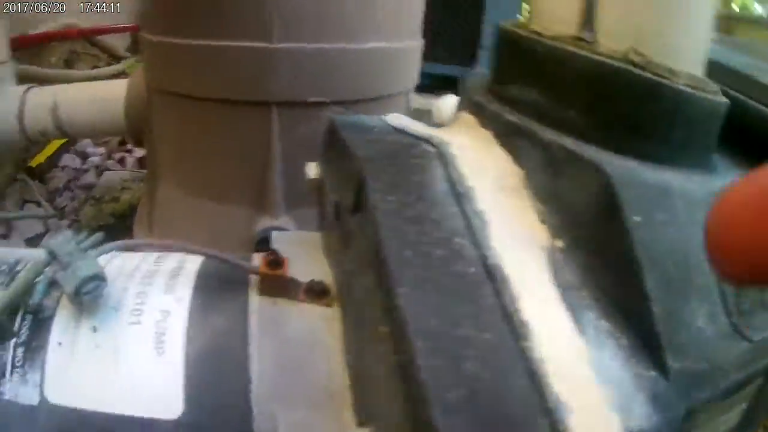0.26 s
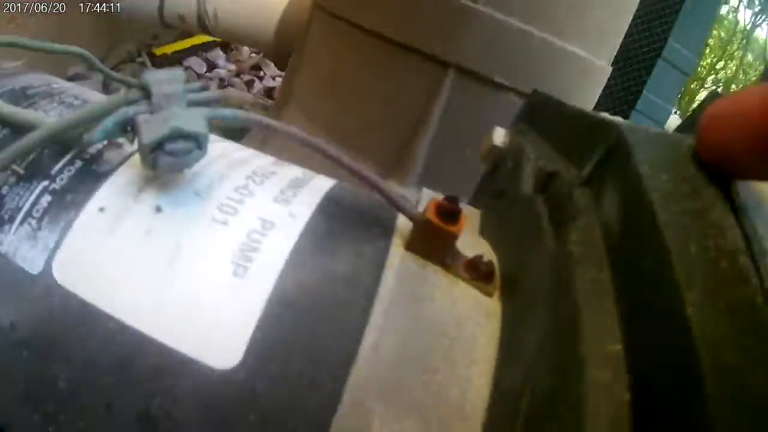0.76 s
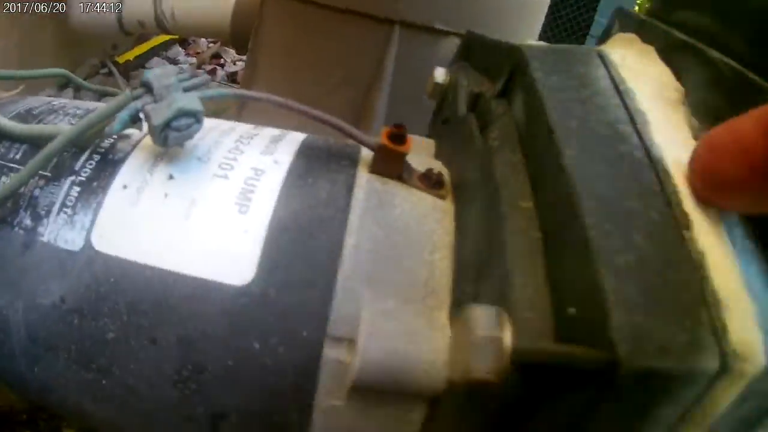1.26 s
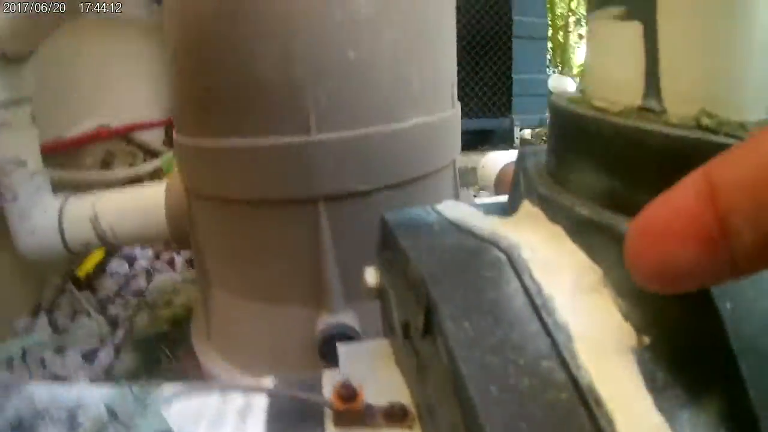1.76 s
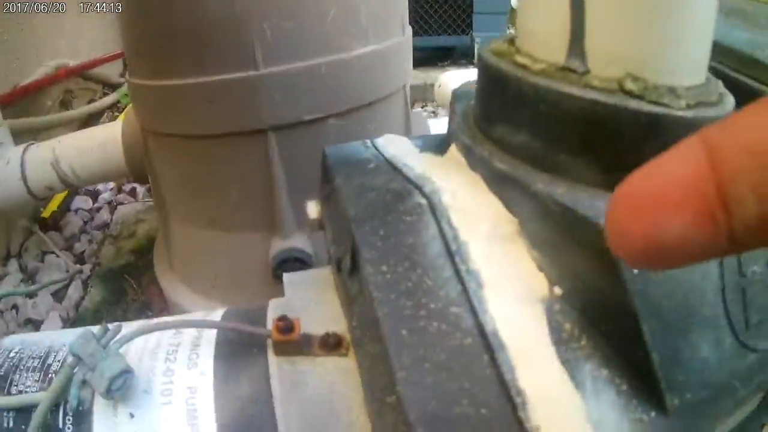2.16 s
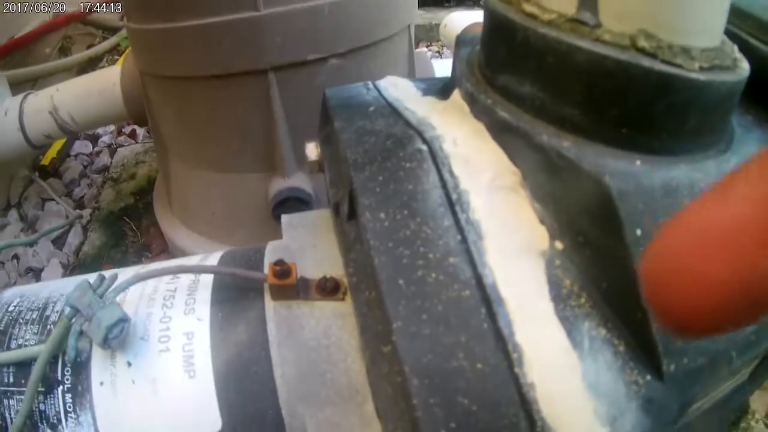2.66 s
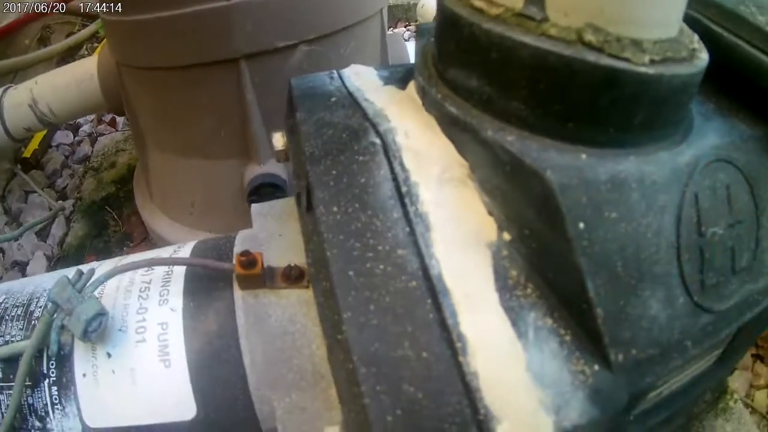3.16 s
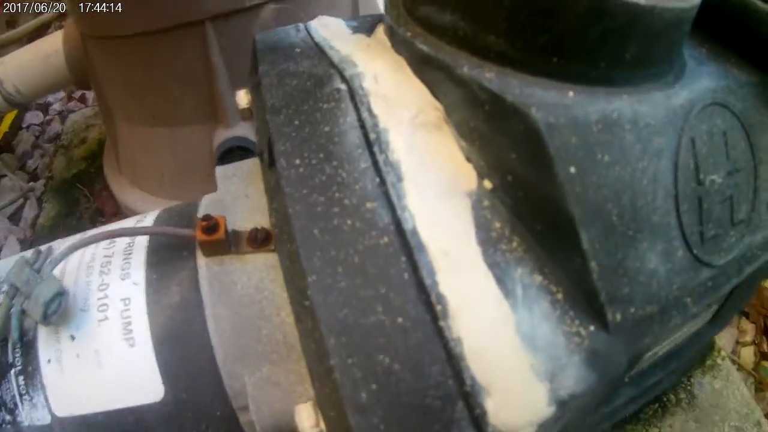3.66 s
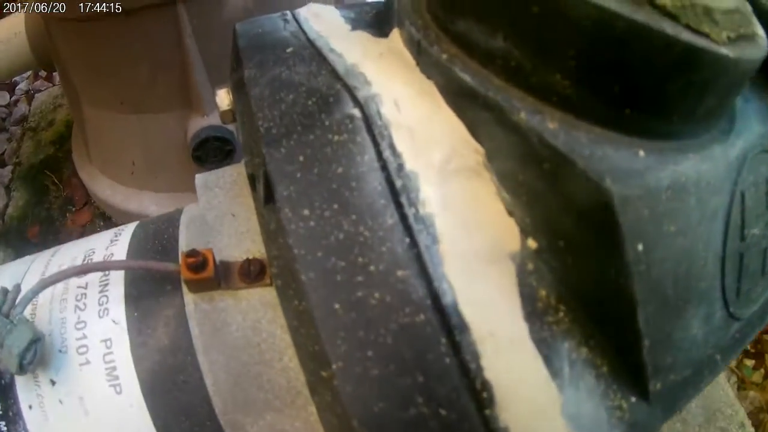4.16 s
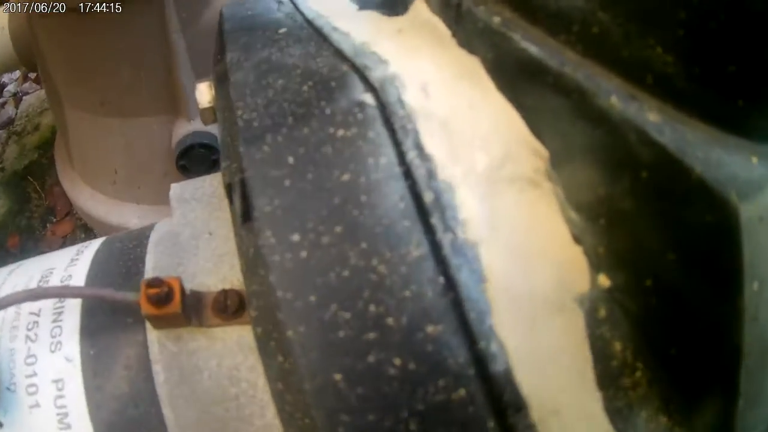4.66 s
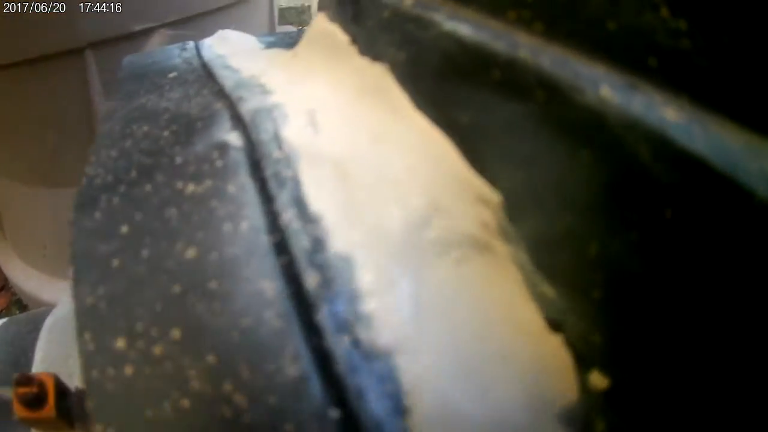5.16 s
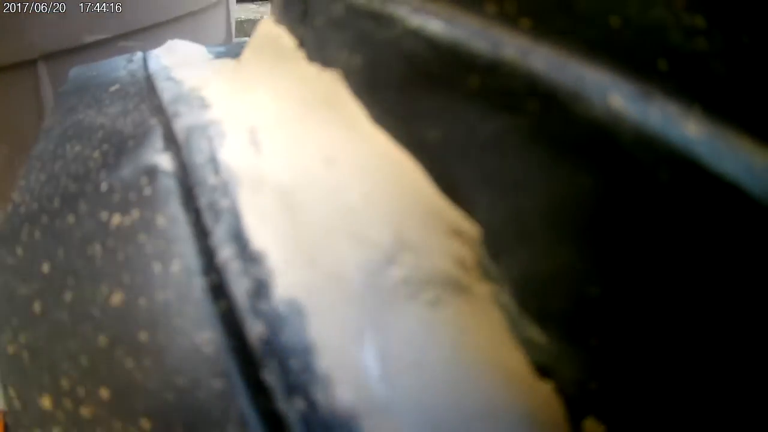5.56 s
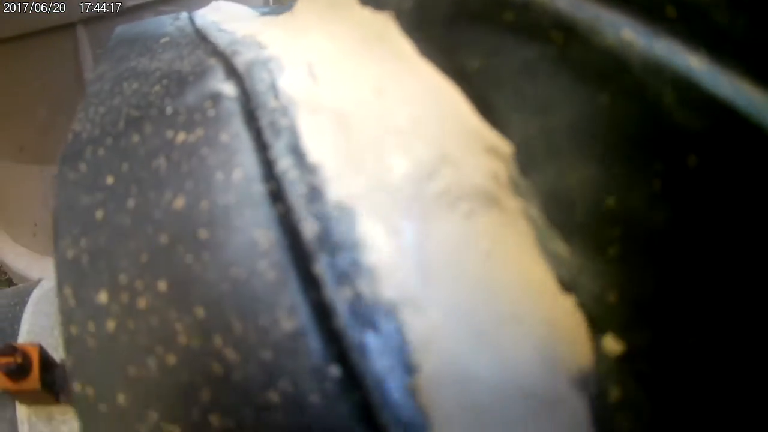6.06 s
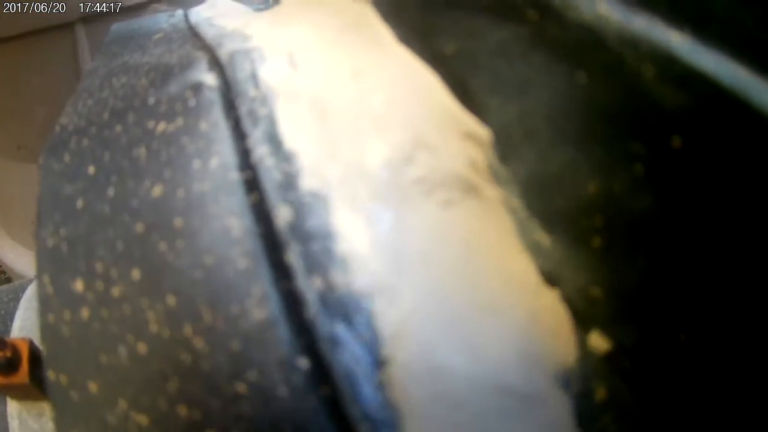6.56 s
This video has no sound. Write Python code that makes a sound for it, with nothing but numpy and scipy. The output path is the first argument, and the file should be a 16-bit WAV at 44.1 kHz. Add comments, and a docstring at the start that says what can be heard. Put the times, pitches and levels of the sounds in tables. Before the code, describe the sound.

Close, steady drone of an electric pool pump with churning water, while fingers knock and scuff on the microphone.

```python
"""A pool pump running outdoors, close up on a hand-held phone microphone that creeps toward its housing.
The induction motor hums and whines, the impeller sings, water churns in the casing and the fan hisses.
Right at the microphone, fingers knock, scuff and slip on the phone's case and the unsteady hand rumbles.
Twice the hand rests on the pump, and the hum comes up through the grip."""
import sys
import numpy as np
from scipy import signal
from scipy.fft import rfft, irfft, dct
from scipy.io import wavfile
from scipy.ndimage import uniform_filter1d

SR = 44100
rng = np.random.default_rng(int(sys.argv[2]) if len(sys.argv) > 2 else 0)


def generate_wav(sig):
    """Save sig (samples, or channels by samples) to the path in sys.argv[1] as 16-bit PCM at SR."""
    pcm = np.round(np.clip(np.atleast_2d(sig).T, -1, 1) * 32767).astype(np.int16)
    wavfile.write(sys.argv[1], SR, pcm)


N = 299880

SHAFT_HZ, MAINS_HZ, RATTLE_HZ = 57.98, 60, 119.05
CHATTER_MULTIPLE, CHATTER_DB, CHATTER_FLUTTER_DB, CHATTER_SLIP_TURNS = 20, -62.5, 2.5, 0.06
# Magnetic hum and rotor-slot sidebands, beside the motor: shaft_multiple, mains_multiple, level_db
MAGNETIC_TONES = [(0, 2, -54), (0, 22, -73), (0, 28, -74), (0, 32, -78), (0, 38, -76), (36, 0, -78),
                  (36, 2, -72), (36, 4, -75), (72, -2, -70), (72, 0, -70), (72, 2, -72), (72, 4, -79),
                  (71, 2, -75), (84, 6, -85), (108, 2, -87)]
# Thin whine from the bearing: rattle_multiple, level_db
BEARING_TONES = [(30, -73), (31, -75), (32, -75), (33, -69), (34, -72), (35, -77), (36, -78)]
def motor(shaft, mains):
    """Magnetic pull on stator and rotor slots, a whining bearing and a loose cover that chatters."""
    magnetic = sum(tone(round(per_shaft) * shaft + round(per_mains) * mains, db, waver_db=2.0)
                   for per_shaft, per_mains, db in MAGNETIC_TONES)
    rattle = shaft * RATTLE_HZ / SHAFT_HZ
    bearing = sum(tone(round(multiple) * rattle, db, waver_db=3.5) for multiple, db in BEARING_TONES)
    cover = CHATTER_MULTIPLE * mains + CHATTER_SLIP_TURNS * walk(45)
    chatter = tone(cover, CHATTER_DB + CHATTER_FLUTTER_DB * walk(28), waver_db=3.0)
    return magnetic + bearing + chatter


# Impeller tones, close to the casing: shaft_multiple, level_db, db_per_near_db, db_per_motor_db
IMPELLER_TONES = [(1, -55.5, -10, 7), (6, -58, 1.6, 1.56), (10, -62, 2, -1), (12, -55.5, 4.5, -1.3),
                  (18, -70.5, 4.5, 1), (20, -80, 6, -8), (30, -70, -9, 4)]
def impeller(shaft, near_db, motor_db):
    """Vanes pass the outlet; each tone beams its own way, so it swells or fades as the phone moves."""
    return sum(tone(round(multiple) * shaft, db + by_near * near_db + by_motor * motor_db, waver_db=1.0)
               for multiple, db, by_near, by_motor in IMPELLER_TONES)


# Water heard through the casing wall: frequency_hz, gain_db
WATER_SPECTRUM = [(120, -5), (230, -3.5), (330, -9.5), (400, -7), (480, 2), (680, -3.5), (830, -5),
                  (1020, -7), (1190, 0), (1300, -5.5), (1390, -9), (1475, -3.5), (1600, -8), (1810, -9.5),
                  (2250, -13), (2550, -17.5), (3200, -21.5), (5000, -68)]
def water(shaft):
    """Turbulence in the casing, throbbing twice a turn."""
    throb = 1 + 0.043 * np.sin(4 * np.pi * shaft)
    churn = grains(spread_db=3) * throb * undb(0.24 * walk(6.7))
    return level(colour(churn, WATER_SPECTRUM), db=-47)


# Air at the motor's vents: frequency_hz, gain_db
FAN_SPECTRUM = [(1800, -37), (2750, -18), (3000, -9), (3280, 3), (3750, -4), (4000, 0.7), (4450, -8),
                (4900, -6.5), (5500, -14), (6400, -12), (7800, -16.5), (10400, -19), (12500, -19),
                (15500, -14)]
def fan(mains):
    """Cooling air hisses through the vents, fluttering with the motor's pull."""
    flutter = 1 + 0.036 * np.sin(4 * np.pi * mains)
    air = grains(spread_db=3) * flutter * undb(0.32 * walk(12))
    return level(colour(air, FAN_SPECTRUM), db=-55)


# The microphone leans over the motor, draws back, then creeps up to the casing:
# start_s, length_s, near_change_db, motor_change_db
MIC_MOVES = [(0.4, 0.48, 1.33, 3.0), (1.38, 0.59, -1.29, -3), (3.507, 2.2, 2, 1.23)]
def mic_position():
    """Closeness to the impeller and exposure to the motor in dB; every move eases in and out."""
    t = np.arange(N) / SR
    near_db, motor_db = -1.0, -0.5
    for start, length, near_change, motor_change in MIC_MOVES:
        progress = np.sin(np.pi / 2 * np.clip((t - start) / length, 0, 1)) ** 2
        near_db = near_db + near_change * progress
        motor_db = motor_db + motor_change * progress
    return near_db, motor_db


# Fingers knocking right by the microphone: start_s, strength_db, contact_ms
FINGER_KNOCKS = [(.1690, 27, 0.051), (0.172, 9, 0.082), (0.2447, 14.5, 0.061), (0.246, 10.5, 0.14),
                 (0.251, 35, 3.2), (0.4389, 5.5, 0.25), (0.797, 28, 4.1), (1.3265, 11, 0.81),
                 (1.8948, 15, 0.63), (3.351, 22, 2.7), (3.3612, 23.5, 1.37), (3.3621, -0.5, 0.027),
                 (5.04, 1, 0.48)]
# Resonances of the phone's case: pitch_hz, width_hz, gain_db
CASE_MODES = [(72.5, 48, 10.5), (155, 144, 1.5), (715, 1250, 1), (1138, 93, 0.5), (1455, 49, 2.5),
              (1810, 51, -5.5), (3130, 180, -10), (3644, 420, 0), (5760, 870, -8), (10400, 730, -26)]
# The phone wobbling in the grip: pitch_hz, width_hz, gain_db
GRIP_MODES = [(32.5, 4.3, 3)]
def fingers():
    """Knocks, judders and scuffs all ring the phone's case; knocks also rock it in the grip."""
    knocks = sum(push(*row) for row in FINGER_KNOCKS)
    force = knocks + sum(judder(*row) for row in FINGER_JUDDERS)
    soft_fingertip = signal.butter(4, 6600, fs=SR, output="sos")
    taps = ring(signal.sosfilt(soft_fingertip, force), CASE_MODES)
    return taps + ring(knocks, GRIP_MODES) + sum(scuff(*row) for row in FINGER_SCUFFS)


def push(start, db, contact_ms):
    """The force of one contact; a softer one lasts longer."""
    age = np.maximum(np.arange(N) / SR - start, 0) * 1000 / contact_ms
    force = age * np.exp(-np.minimum(age, 60))
    return undb(db) * force / force.sum()


FINGER_PAD_HZ = [140, 316]  # the band in which the pad shudders
# A fingertip juddering over the phone: start_s, length_s, slip_rate_hz, strength_db
FINGER_JUDDERS = [(1.342, 0.027, 117, 11.5), (1.387, .013, 192, 13), (1.44, 0.006, 230, 6.5)]
def judder(start, length, rate, db):
    """A fingertip sticks and slips at a near-steady rate: a short, low, pitched rub."""
    slips = sum(push(s + 0.028 * rng.standard_normal() / rate, db + rng.standard_normal(), 0.66)
                for s in np.arange(start, start + length, 1 / rate))
    return signal.sosfilt(signal.butter(2, FINGER_PAD_HZ, "bandpass", fs=SR, output="sos"), slips)


# Fingers brushing the phone: middle_s, half_length_s, level_db, low_hz, high_hz
FINGER_SCUFFS = [(0.173, 0.02, -34, 200, 18000), (0.242, 0.02, -32, 201, 18000),
                 (0.269, 0.013, -35.5, 2080, 3400), (0.942, 0.014, -62, 8000, 18000),
                 (1.587, 0.023, -37, 101, 10900), (1.738, 0.037, -43.5, 100, 9000),
                 (1.848, 0.076, -44.5, 99, 9100), (3.363, 0.0027, -28, 980, 11000),
                 (3.37, 0.022, -34.5, 200, 14000), (3.398, 0.017, -41.5, 200, 8000)]
# Skin on plastic, right at the microphone: frequency_hz, gain_db
GRIT_SPECTRUM = [(100, 12), (1000, 5), (2100, 4), (2800, 0), (3700, 5), (4600, -1.5), (5900, -1),
                 (7800, -8.5), (10600, -1), (15000, -5)]
def scuff(middle, half_length, db, low_hz, high_hz):
    """Skin grits over the case, pressing evenly and stopping quickly; each stroke has its own band."""
    grit = ring(colour(grains(spread_db=0.5), GRIT_SPECTRUM), CASE_MODES)
    band = signal.butter(2, [low_hz, high_hz], "bandpass", fs=SR, output="sos")
    pressure = np.exp(-((np.arange(N) / SR - middle) / half_length) ** 4)
    return level(signal.sosfilt(band, grit), db) * pressure


RUMBLE_SWAY_DB, SHAFT_SHAKE_DB = 1.5, -3.5
# Handling rumble at the microphone: time_s, level_db
RUMBLE_LEVELS = [(0.0, -32.5), (0.09, -34.5), (0.26, -24.5), (0.42, -27.5), (1.93, -32.5), (2.14, -38.5),
                 (2.67, -34), (6.8, -36.5)]
# Tone of that rumble: frequency_hz, gain_db
RUMBLE_SPECTRUM = [(7.1, -52), (12, 3), (31, 0), (54, -7), (124, -18.5), (147, -23), (244, -42), (290, -32),
                   (380, -83), (640, -120)]
def hand(shaft, mains):
    """The grip rumbles, and passes on the pump's hum and the shake of its unbalanced shaft."""
    rumble_db, = curves(RUMBLE_LEVELS)
    rumble = level(colour(rng.standard_normal(N), RUMBLE_SPECTRUM), 0)
    rumble *= undb(rumble_db + RUMBLE_SWAY_DB * walk(8.4))
    shaking = tone(2 * mains, 0, waver_db=0.8) + tone(shaft, SHAFT_SHAKE_DB, waver_db=0.8)
    return rumble + shaking * sum(touch(*row) for row in PUMP_TOUCHES)


TOUCH_ATTACK_S, TOUCH_RELEASE_S, PRESS_DB_PER_S = 0.033, 0.07, 12
# The microphone hand resting on the pump: start_s, length_s, starting_gain_db
PUMP_TOUCHES = [(1.07, 0.263, -44), (5.36, 0.531, -39.5)]
def touch(start, length, db):
    """Gain of the path through the hand: it takes hold, presses harder and lets go."""
    age = np.arange(N) / SR - start
    held = np.clip(age / TOUCH_ATTACK_S, 0, 1) * np.clip(1 - (age - length) / TOUCH_RELEASE_S, 0, 1)
    return held * undb(db + PRESS_DB_PER_S * np.clip(age, 0, length))


def undb(db):
    """Decibels to gain."""
    return 10 ** (np.asarray(db) / 20)


def level(x, db):
    """Scale a sound to an rms level."""
    return x * undb(db) / np.sqrt(np.mean(x ** 2))


def curves(table):
    """The columns of a timed table, one value a sample."""
    times, *columns = np.transpose(table)
    return [np.interp(np.arange(N) / SR, times, column) for column in columns]


def walk(rate):
    """Random values held 1 / rate s and smoothed twice, at an rms of 1."""
    hold = int(SR / rate)
    steps = np.repeat(rng.standard_normal(N // hold + 1), hold)
    return level(uniform_filter1d(uniform_filter1d(steps, hold), hold)[:N], 0)


def colour(x, spectrum):
    """Filter by a curve of frequency_hz, gain_db."""
    hz, db = np.transpose(spectrum)
    f = np.maximum(np.arange(N), 1) * SR / (2 * N)
    gain = undb(np.interp(np.log(f), np.log(hz), db))
    return dct(dct(x, norm="ortho") * gain, type=3, norm="ortho")


def ring(x, modes):
    """Drive resonances of pitch_hz, width_hz, gain_db."""
    f = np.maximum(np.arange(N // 2 + 1), .5) * SR / N
    response = sum(undb(db) / (1 + 1j * (f * f - hz * hz) / (f * width)) for hz, width, db in modes)
    return irfft(rfft(x) * response, N)


def grains(spread_db):
    """Dense tiny impacts of uneven size."""
    return level(rng.standard_normal(N) * undb(spread_db * rng.standard_normal(N)), 0)


def tone(turns, db, waver_db):
    """A sine that follows a count of turns and wavers in level."""
    return np.sqrt(2) * undb(db + waver_db * walk(9.1)) * np.sin(2 * np.pi * (turns + rng.random()))


def scene():
    """The pump from where the phone is held, with the handling noise on top."""
    near_db, motor_db = mic_position()
    mains = MAINS_HZ * np.arange(N) / SR  # mains and shaft are phases, counted in turns
    shaft = np.cumsum(SHAFT_HZ * (1 + 0.000304 * walk(4.08))) / SR  # the water load nudges the speed
    wet_end = impeller(shaft, near_db, motor_db) + water(shaft) * undb(near_db)
    dry_end = (motor(shaft, mains) + fan(mains)) * undb(motor_db)
    return (wet_end + dry_end + hand(shaft, mains) + fingers())[None]


OVERLOAD, TOP_HZ = .92, 15750
# Narrow bands that cancel on the way into the microphone: centre_hz, width_hz, cancelled_share_db
MIC_NOTCHES = [(1347, 124, -2.5), (1729, 38, -6.5), (2680, 470, -13.5)]
# Treble response of the microphone port: frequency_hz, gain_db
MIC_PORT = [(6300, 0.5), (7800, -8.5), (10000, -1.5), (15000, -10.5)]
def record(dry):
    """The microphone hollows a few bands, rounds the hardest knock, dulls the treble and cuts the top."""
    hollow = dry - ring(dry, MIC_NOTCHES)
    rounded = hollow / (1 + (hollow / OVERLOAD) ** 4) ** .25
    top_cut = signal.ellip(10, .1, 80, TOP_HZ, fs=SR, output="sos")
    return signal.sosfiltfilt(top_cut, colour(rounded, MIC_PORT))


dry = scene()
out = record(dry)
generate_wav(out)
```